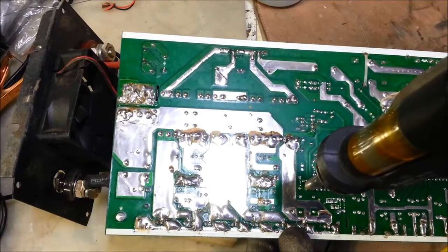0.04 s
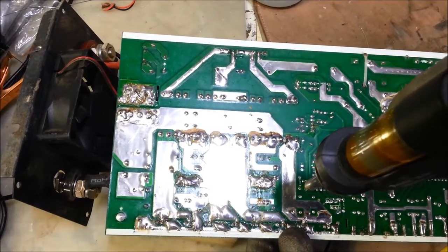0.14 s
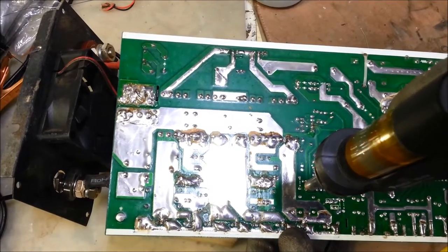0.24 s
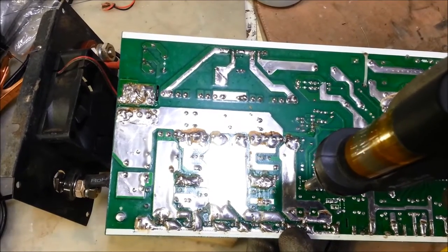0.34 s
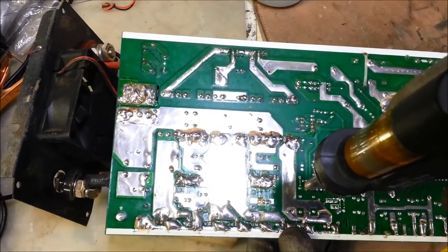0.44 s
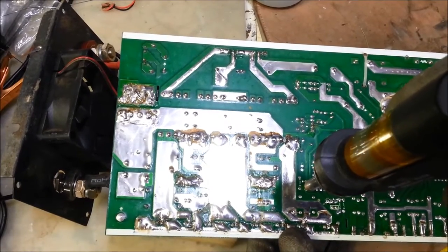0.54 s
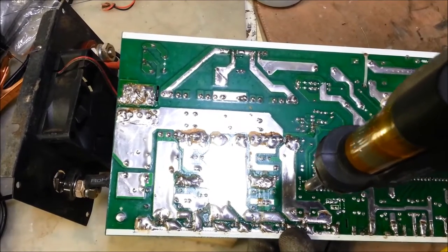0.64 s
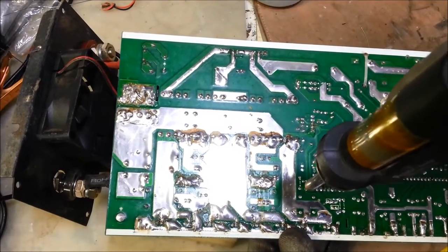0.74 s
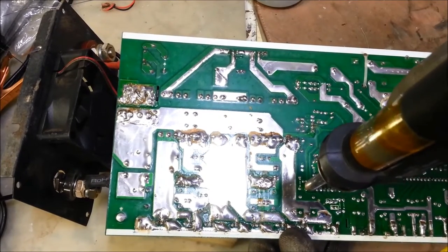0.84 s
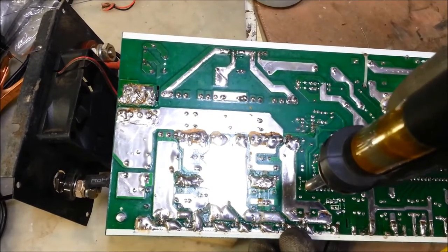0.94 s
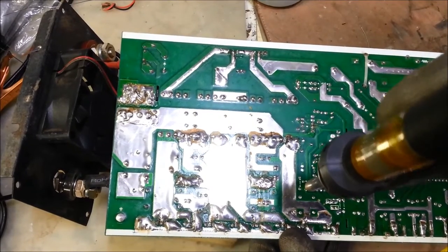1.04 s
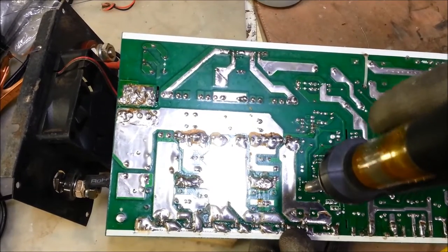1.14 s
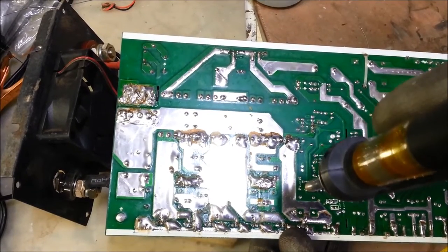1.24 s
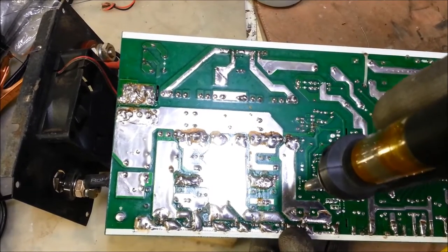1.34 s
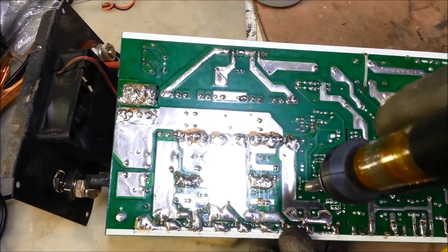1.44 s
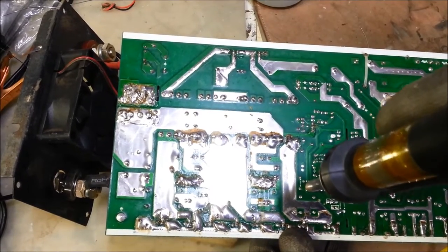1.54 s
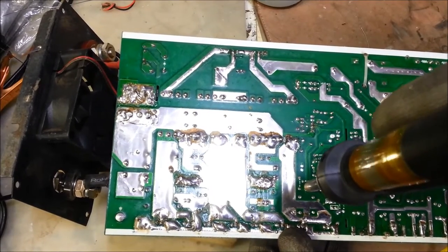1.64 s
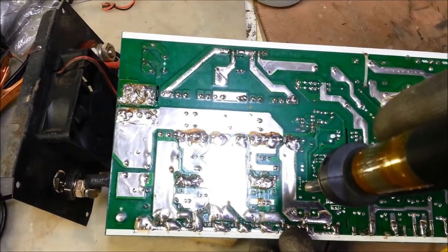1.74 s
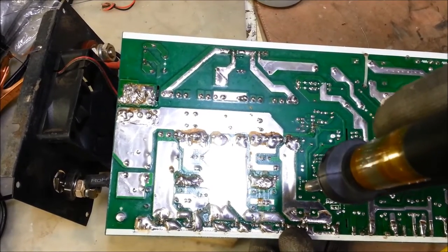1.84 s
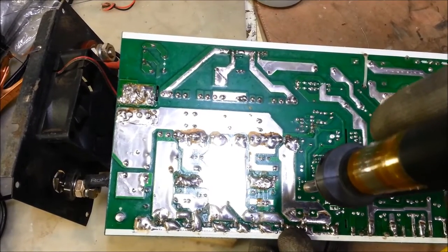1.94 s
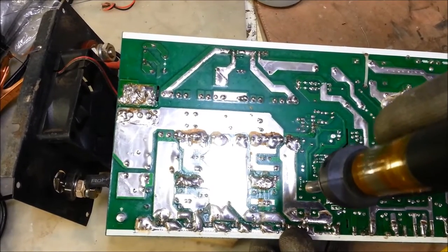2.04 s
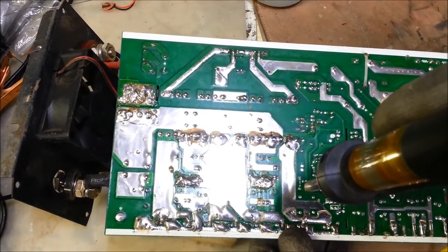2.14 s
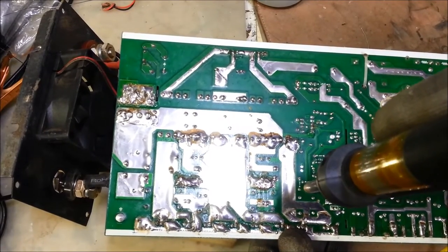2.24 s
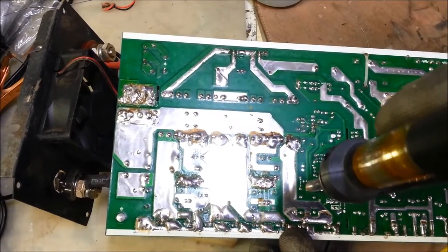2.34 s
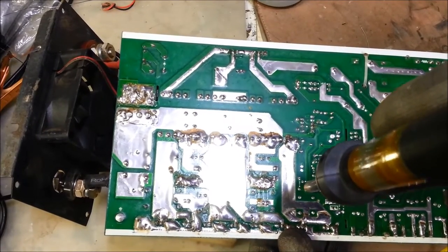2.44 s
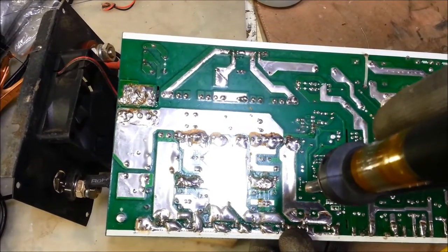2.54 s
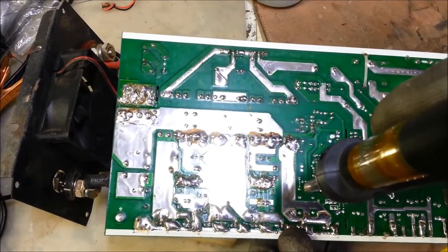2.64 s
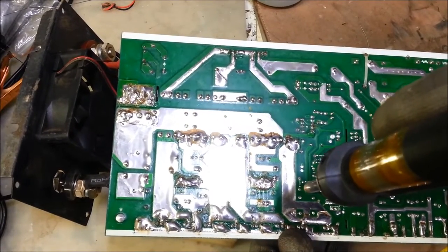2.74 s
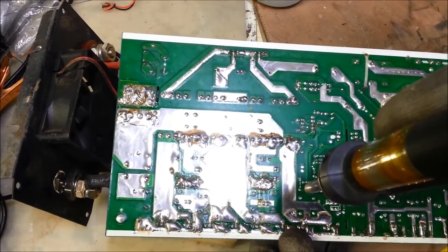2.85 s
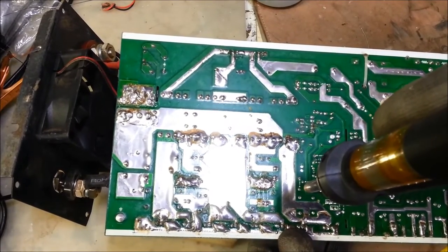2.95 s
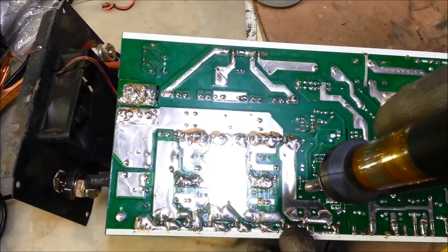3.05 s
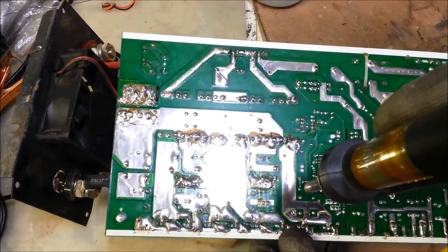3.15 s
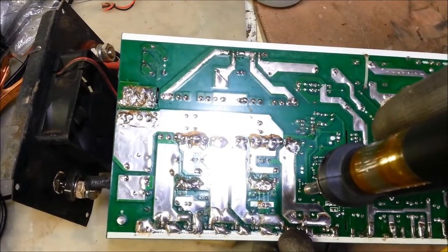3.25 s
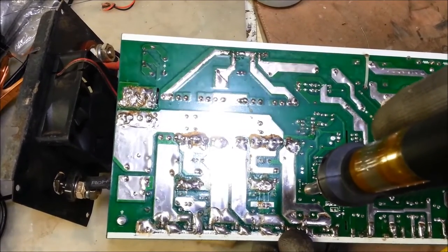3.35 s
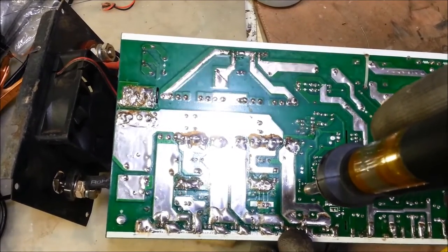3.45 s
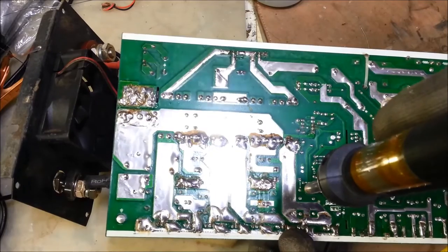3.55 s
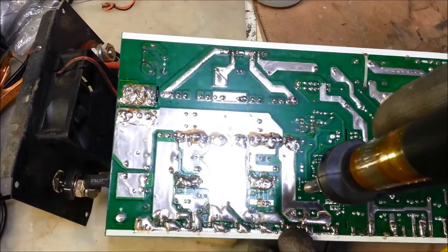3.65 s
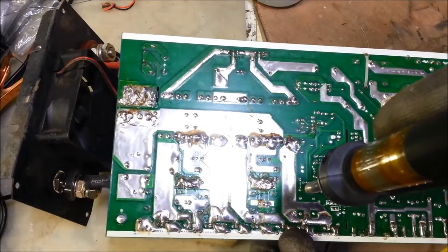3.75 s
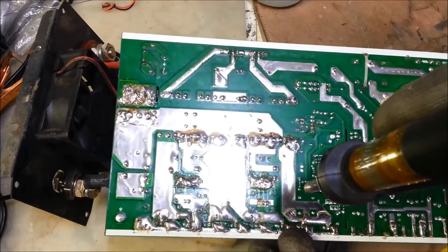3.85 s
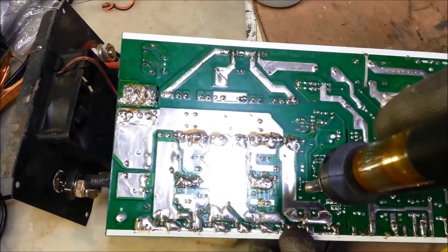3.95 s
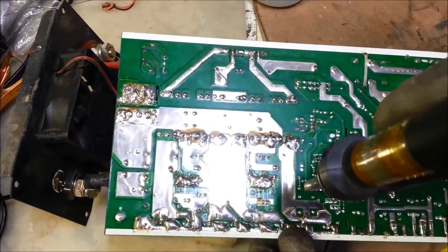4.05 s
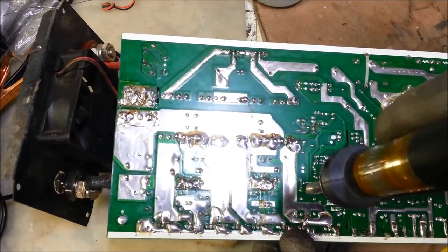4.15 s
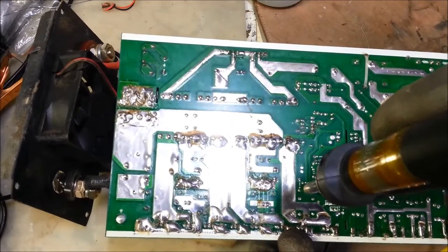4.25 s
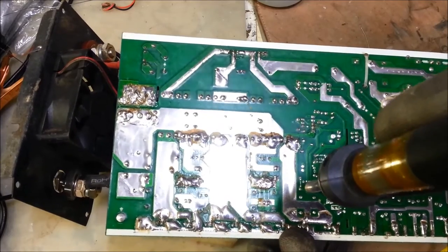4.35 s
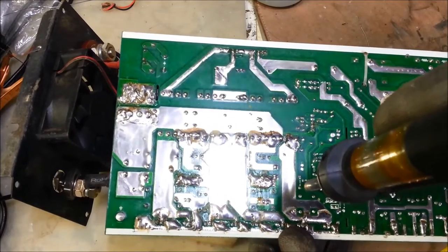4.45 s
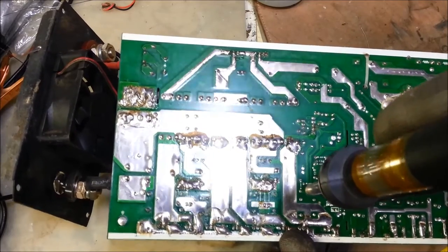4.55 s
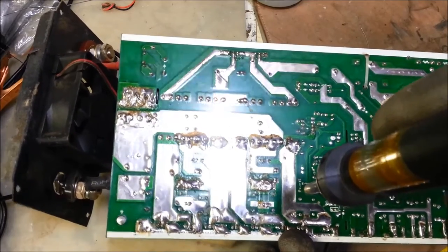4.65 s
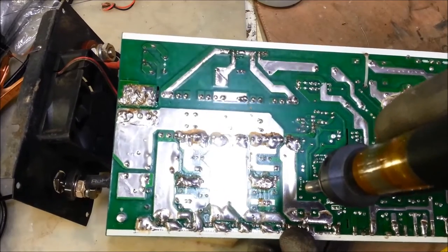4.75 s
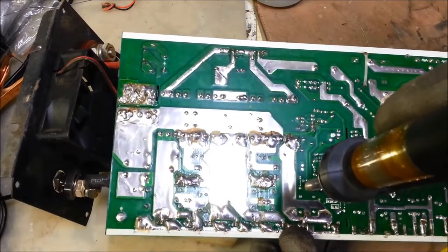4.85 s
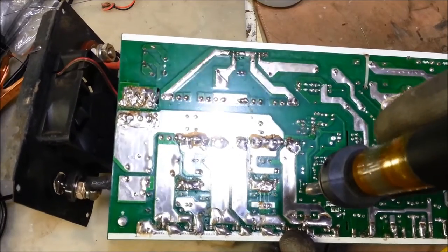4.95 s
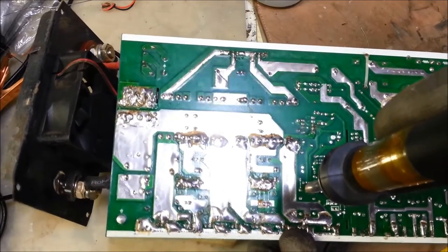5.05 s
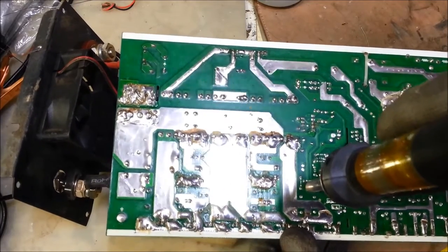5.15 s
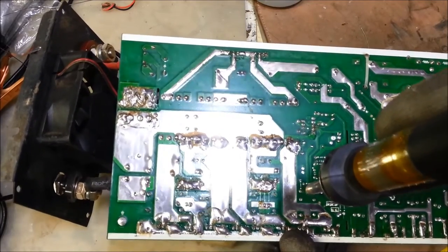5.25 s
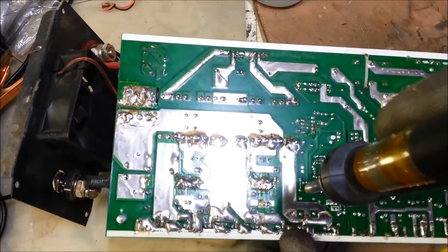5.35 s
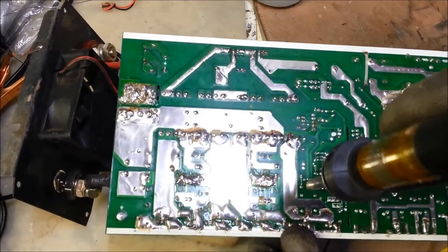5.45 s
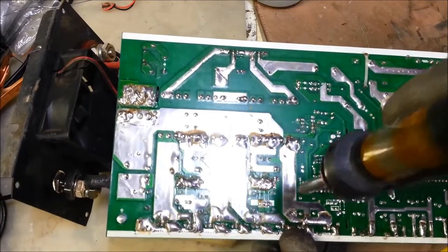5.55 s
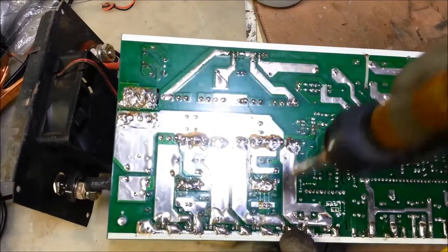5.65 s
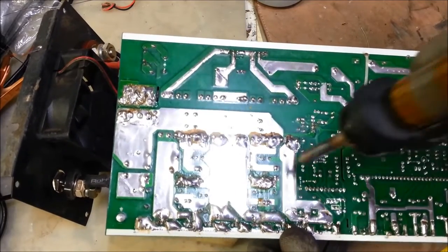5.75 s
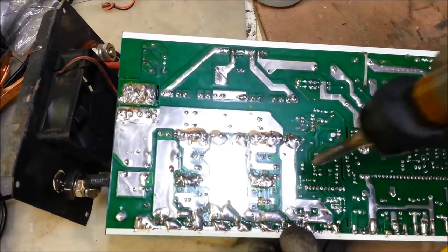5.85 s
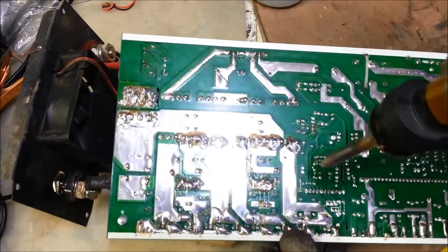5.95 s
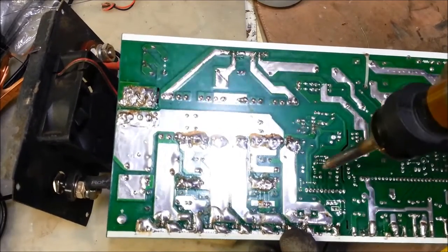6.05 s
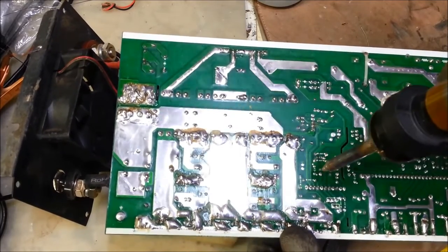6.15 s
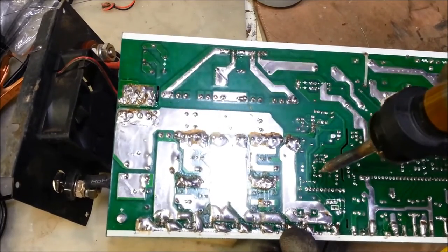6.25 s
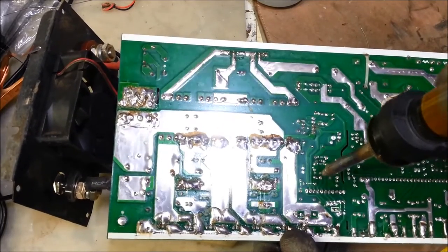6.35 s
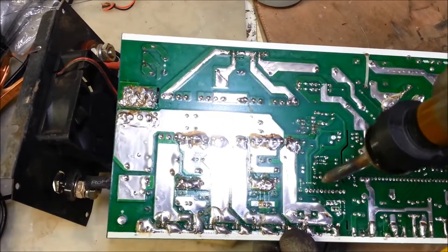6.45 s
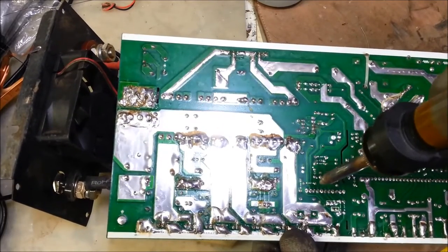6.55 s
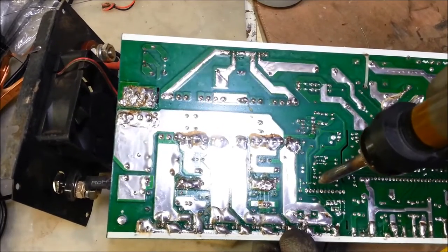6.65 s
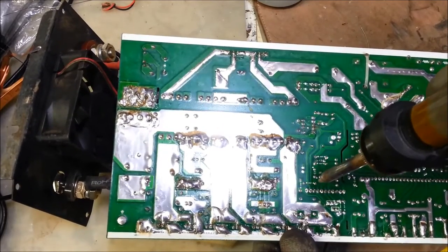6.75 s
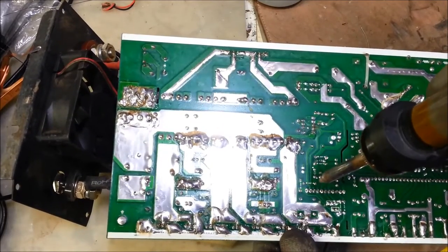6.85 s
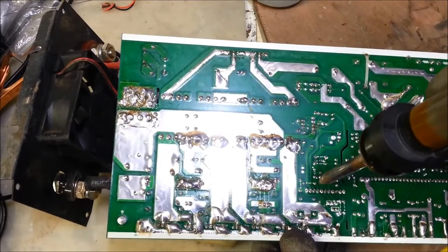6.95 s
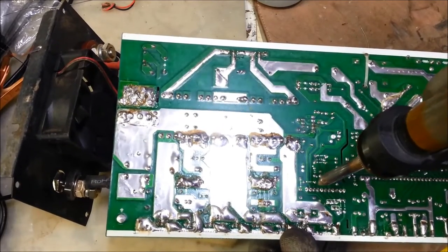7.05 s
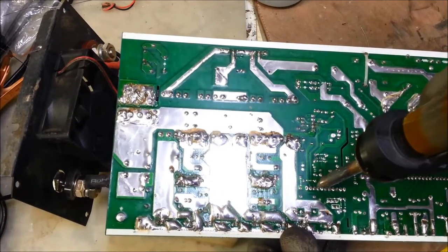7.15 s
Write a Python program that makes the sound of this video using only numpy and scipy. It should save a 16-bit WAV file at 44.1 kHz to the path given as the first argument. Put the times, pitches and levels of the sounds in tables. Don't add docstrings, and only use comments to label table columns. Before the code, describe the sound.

A steady airy fan whine fills a small room, dotted with small gritty scrapes and hard taps of metal on board. Past the midpoint a sharp click starts a desoldering gun's pump, a dense low rattling buzz with bright air hiss, very loud and close. It ends with a short squeak and snap, a couple of dying knocks, then the fan's whine rising again over faint contacts.

```python
import sys
import numpy as np
from scipy import signal
from scipy.fft import rfft, irfft, next_fast_len
from scipy.io import wavfile

SR = 44100
rng = np.random.default_rng(int(sys.argv[2]) if len(sys.argv) > 2 else 0)


def master(y):
    cut = np.clip(np.atleast_2d(y).T, -1, 1)
    pcm = np.round(cut * 32767)
    wavfile.write(sys.argv[1], SR, pcm.astype(np.int16))


def to_linear_factor(level_db):
    exponent = np.asarray(level_db, float) / 20
    return 10 ** exponent


N = 317705
T_S = np.arange(N) / SR

# multiple, full_speed_db, slowed_db, left_minus_right_db
FAN_WHINE = [(1, -3.5, -3.5, -1.5), (3, -25, 0, 14), (4, -6, 0, 12), (5, -5.5, -4.5, -14),
             (6, 3.5, -23, -5.5), (7, -10, -1, -1), (8, -16, -3.5, 1)]
# start_s, sixth_multiple_hz
FAN_HUNT = [
    (0.05, 2379),
    (0.57, 2376),
    (1.01, 2388),
    (1.49, 2376),
    (2.17, 2386),
    (2.89, 2376),
    (3.44, 2388),
    (3.8, 2385),
]
HUNT_DB_PER_HZ = {5: -0.3, 6: 0.34}
# freq_hz, half_width_hz, level_db
DEAD_SPOTS = [(1554, 26, -3.5), (1787, 31, -2), (1890, 23, -7), (2610, 18, -7), (2743, 24, -12)]
# freq_hz, level_db_per_hz
FAN_RUSH = [(60, -46), (120, -27), (200, -24.5), (300, -11.5), (385, -3.5), (460, -6.5), (540, -9),
            (680, -11.5), (1050, -6.5), (1400, -12), (1900, -11.5), (2600, -18.5), (4000, -18.5),
            (6500, -30.5)]
# freq_hz, level_db_per_hz
FAN_HISS = [(1760, -27.5), (3000, -21), (4490, -20), (5220, -6), (13900, -12), (14750, -10), (15000, -10)]
# freq_hz, share
ALIKE = [(60, 0.6), (170, 0.48), (350, 1), (700, 0.89), (1100, 0.19), (2000, 0.059), (3500, 0.33),
         (8000, 0.038), (15000, 0.046)]
# start_s, level_db
JOLTS = [
    (1.27, -69),
    (1.55, -76),
    (2.13, -81),
    (2.39, -66),
    (4.3, -60),
    (5.69, -51),
    (6.05, -74),
    (6.15, -69),
    (6.681, -79),
]
# start_s, peak_db, ring_hz, dull_db
TOUCHES = [(0.368, -43, 3450, -39), (.607, -36.5, 5700, -35), (.72, -51, 3240, -46),
           (1.087, -47, 4960, -39), (1.21, -44, 3800, -38), (1.231, -37, 5160, -32),
           (1.253, -37, 5500, -33), (1.516, -43.5, 5300, -39), (1.606, -46, 4900, -40),
           (1.81, -53, 3200, -42), (1.8775, -45, 5000, -33.5), (2.002, -42, 5000, -38),
           (2.083, -39, 5800, -37), (2.1286, -27, 5600, -24.5), (2.133, -36, 9000, -34),
           (2.156, -39, 6070, -32), (2.2637, -54, 4950, -39), (2.293, -48, 3000, -33.5),
           (2.3395, -29, 8500, -44), (2.384, -23.5, 5300, -25), (2.412, -31.5, 5000, -24.5),
           (2.652, -40, 4570, -32), (2.735, -45, 5100, -30.5), (2.777, -38.5, 4860, -32),
           (2.86, -34, 5670, -35), (4.288, -29, 3256, -33), (5.3, -31.5, 8800, -40),
           (5.325, -30, 8600, -36), (5.76, -48, 3090, -48), (6.178, -54, 3010, -38),
           (6.45, -38.5, 5300, -40)]
# start_s, peak_db, ring_hz, t60_s
TAPS = [(1.2317, -26, 5240, .02), (1.2535, -15.5, 4930, 0.013), (1.8134, -44, 3200, .012),
        (1.8778, -26.5, 2270, 0.016), (1.881, -33, 1150, 0.033), (2.1312, -23, 4350, 0.012),
        (2.265, -28.5, 1020, .04), (2.416, -33, 1110, 0.035), (2.3851, -21, 3100, .012),
        (5.698, -20, 835, 0.07), (5.722, -28, 860, .05), (5.743, -26.5, 2660, 0.027),
        (5.757, -26, 1980, 0.021), (5.762, -32, 2430, 0.059)]
# freq_hz, level_db, t60_s
PRESS_MODES = [(1400, -14, .02), (2300, -7, .012), (3200, -8, .02), (4600, -5, .008), (5200, -1, .009),
               (5900, -12, .02), (7240, -3, .016), (9500, -14, .01), (11800, -9, .012), (13500, -14, .01)]
# start_s, pitch_hz, level_db
SQUEAK = [
    (5.671, 7050, -31),
    (5.682, 7150, -20),
    (5.688, 6900, -10.5),
    (5.696, 5070, -36),
]
# freq_hz, level_db, t60_s
SNAP_MODES = [(3740, 0.5, 0.042), (4400, 0.5, 0.0037), (5500, -8, 0.008), (6630, 3.5, 0.01),
              (7600, 1.5, 0.0066), (8600, -13, .006), (9800, -14, .006), (11670, -10.5, 0.0054),
              (14100, -6, .004)]
# start_s, rate_strokes_per_s, grip_db (lift of modes over 700 Hz)
PUMP_LOAD = [
    (4.15, 87.9, 1.0),
    (4.304, 88.6, -1),
    (4.662, 88.8, 2),
    (4.7, 89.4, 2.5),
    (4.948, 88.5, 2),
    (5.092, 87.4, 2),
    (5.158, 88.0, 2),
    (5.462, 88.3, 2),
    (5.66, 87.8, 1.0),
]
# freq_hz, width_hz, level_db, left_minus_right_db, left_late_ms
CASE_MODES = [(165, 26, -6.2, -1.2, .52), (256, 36, -7, -1.3, .37), (347, 26, 2.6, -.4, .33),
              (525, 43, -17.5, 8, .37), (632, 37, -28, 8, .36), (793, 80, -19, 3, .46),
              (906, 181, -19.5, 20, 0), (957, 38, -7.5, 20, 0), (1032, 64, -9.5, 1.5, .33),
              (1181, 50, -12.5, 6, .2), (1409, 48, -6.5, 5, .41), (1482, 78, -17.5, -14, 0),
              (1680, 90, -21, 2, .38), (1925, 100, -12.5, -5.7, .38), (2081, 76, -11.5, 2.2, .38),
              (2296, 46, -6, 1, .31), (2418, 68, -21, 19.5, .35), (2655, 43, -15.5, 3, .33),
              (3065, 150, -27, -4, .45), (3290, 40, -15, -1, .31), (3910, 96, -34, -2, .32),
              (2250, 500, -27, 0, .35)]
# top_hz, late_ms
PANELS = [(200, 2.06), (450, 1.62), (700, 3.49), (1250, 2.43), (1800, 7.99), (2900, 3.65), (5000, 5.8)]
# top_hz, level_db
SLACK = [(200, -0.85), (300, -.45), (450, -0.0441), (700, 0.285), (930, .5), (1000, 0.17), (1100, 0.1),
         (1250, -0.1545), (1600, -0.2035), (1800, 0.16), (2200, 0), (2350, -0.22), (5000, -0.2838)]
# freq_hz, level_db_per_hz
SUCTION = [(1470, 1.5), (2500, -3), (2870, -23.5), (3310, -11), (3950, -11), (5190, -10.5), (8910, -11.5),
           (11700, -27), (12300, -21.5), (14300, -23), (14600, -24), (14900, -24)]
# freq_hz, width_hz, level_db
WHISTLES = [(5300, 80, 0), (6200, 43, 3), (7800, 44, 0)]
# freq_hz, level_db, t60_s
LAST_STROKE = [(334, -7, 0.042), (790, -10, 0.044), (957, -5, 0.059), (1190, -12, 0.032), (1950, -12, .025),
               (2600, -14, .022)]

ON_S, OFF_S, STALL_S = 3.834, 5.688, 5.765
FAN_BLADES_PER_S, FAN_SAG_S = 397.3, 0.2


def rms_one(x):
    return x / np.sqrt(np.mean(x ** 2) + 1e-20)


def from_db(db):
    return np.exp(db * np.log(10) / 20)


def since(at_s):
    return np.maximum(T_S - at_s, 0)


def bump(at_s, width_s):
    return np.exp(-((T_S - at_s) / width_s) ** 2)


def in_time(rows):
    s, *columns = np.transpose(rows)
    return [np.interp(T_S, s, c) for c in columns]


def at_hz(points, hz):
    points = np.array(points)
    return np.interp(np.log(hz), np.log(points[:, 0]), points[:, 1])


def drift(rate_hz):
    r = np.exp(-80 * np.pi * rate_hz / SR)
    white = rng.standard_normal(N // 40 + 4002)
    slow = signal.lfilter([1], [1, -2 * r, r * r], white)[4000:]
    return np.interp(np.arange(N) / 40, np.arange(len(slow)), rms_one(slow))


def butter(x, order, hz, kind):
    return signal.sosfilt(signal.butter(order, hz, kind, fs=SR, output="sos"), x)


def resonance(x, hz, width_hz):
    r = np.exp(-np.pi * width_hz / SR)
    poles = [1, -2 * r * np.cos(2 * np.pi * hz / SR), r * r]
    return signal.lfilter(np.array([1, 0, -1]) * (1 - r * r) / 2, poles, x + 1e-18)


def ports(x, pan_db, lag_ms=0.374):
    whole, part = divmod(max(lag_ms, 0) * SR / 1000, 1)
    late = (1 - part) * np.roll(x, int(whole)) + part * np.roll(x, int(whole) + 1)
    return np.array([late * to_linear_factor(pan_db / 2), x * to_linear_factor(-pan_db / 2)])


def air(spectrum, patchy_db, pan_db):
    top_hz = 14700
    ends = np.log2(np.array(spectrum)[[0, -1], 0])
    edges = 2 ** np.arange(ends[0], ends[1] + 0.2, 1 / 3)
    white = rng.standard_normal((2, 3, N))
    out, together = 0, drift(27.0)
    for k, (low, high) in enumerate(zip(edges, edges[1:])):
        both, *own = butter(white[k % 2], 2, [low, high], "band")
        hz = np.sqrt(low * high)
        alike = np.clip(at_hz(ALIKE, hz), 0, 1)
        gain = from_db(at_hz(spectrum, hz) + patchy_db * (0.47 * together + drift(6.9)))
        out = out + gain * (np.sqrt(alike) * ports(both, 0) + np.sqrt(1 - alike) * np.array(own))
    out = signal.sosfilt(signal.cheby2(16, 45, top_hz, fs=SR, output="sos"), out)
    return rms_one(out) * to_linear_factor(np.array([[pan_db], [-pan_db]]) / 2)


def click(at_s, modes, chatter_s, crack_db, from_hz=250):
    out, t = np.zeros((2, N)), np.arange(4000) / SR
    for delay_s, db in [(0, -3), (chatter_s, 0), (3.5 * chatter_s, -11)]:
        start = round((at_s + delay_s) * SR)
        hit = to_linear_factor(crack_db - 60 * t / 0.025) * np.diff(rng.standard_normal((2, len(t) + 1)))
        for hz, level_db, t60_s in modes:
            phase = 2 * np.pi * hz * t + rng.uniform(-0.69, 0.74, (2, 1))
            hit += to_linear_factor(level_db - 60 * t / t60_s) * np.sin(phase)
        out[:, start:start + len(t)] += to_linear_factor(db) * hit
    return butter(out + 1e-9 * np.cos(np.arange(N)), 3, from_hz, "high")


def fan_state():
    sag_per_s, regain_s = 61, 0.47
    load = -np.expm1(-since(ON_S) / FAN_SAG_S)
    running = load * np.clip(1 - since(OFF_S + 0.074) / 0.023, 0, 1)
    before = np.clip(1 - since(ON_S) / FAN_SAG_S, 0, 1)
    duck_db = -5.5 * (load - running) * np.exp(-since(STALL_S + 0.16) / 1.5)
    rush_db = -43.5 - 0.7 * T_S * before + 6 * running + duck_db
    hiss_db = -56 + 1 * running + 0.73 * duck_db
    whine_db = -51.5 + 0.4 * (T_S - 1.9) * before + 3 * running + 0.55 * duck_db
    blades_per_s = FAN_BLADES_PER_S - sag_per_s * load * np.exp(-since(OFF_S) / regain_s)
    return blades_per_s, rush_db, hiss_db, whine_db


def dead_spot_db(hz):
    loss_db = 0
    for at, half_width_hz, db in DEAD_SPOTS:
        if hz.min() < at < hz.max():
            loss_db = loss_db + db * np.clip(2 - abs(hz - at) / half_width_hz, 0, 1)
    return loss_db


def fan():
    blades_per_s, rush_db, hiss_db, whine_db = fan_state()
    flutter_db = 1.1
    slowed = (397 - blades_per_s) / 50
    idle = np.clip(1 - since(ON_S) / FAN_SAG_S, 0, 1)
    hunt_hz = (in_time(FAN_HUNT)[0] - 6 * FAN_BLADES_PER_S) * idle
    phase = 2 * np.pi * np.cumsum((blades_per_s + hunt_hz / 6) * (1 + 0.0005 * drift(7.9))) / SR
    whine = 0
    for k, db, slow_db, pan_db in FAN_WHINE:
        level_db = db + dead_spot_db(k * blades_per_s) + slowed * (slow_db - db)
        level_db = level_db + HUNT_DB_PER_HZ.get(k, 0) * hunt_hz + flutter_db * drift(4.4)
        whine = whine + ports(from_db(level_db) * np.sin(k * phase + k * k), pan_db)
    rush = butter(to_linear_factor(rush_db) * air(FAN_RUSH, patchy_db=0.6, pan_db=-0.5), 3, 170, "high")
    hiss = to_linear_factor(hiss_db) * air(FAN_HISS, patchy_db=0.5, pan_db=0.2)
    return to_linear_factor(whine_db) * whine + rush + hiss


def bench(shaken):
    low = butter(rng.standard_normal((2, N)), 2, [10, 100], "band")
    jolts = sum(to_linear_factor(db) * bump(s, 0.028) for s, db in JOLTS)
    lumps = to_linear_factor(3.5 * drift(9))
    return rms_one(low) * (lumps * (to_linear_factor(-89) + to_linear_factor(-56) * shaken) + jolts)


def touches():
    out, t = np.zeros((2, N)), np.arange(3000) / SR
    for s, db, hz, dull_db in TOUCHES:
        length_s = 0.012 + 0.0004 * (dull_db + 40)
        shape = (1 - np.exp(-t / 0.003)) ** 2 * np.exp(-2.5 * t / length_s)
        grit = rng.standard_normal((3, len(t))) * to_linear_factor(5.8 * rng.standard_normal(len(t))) * shape
        grit = grit[0] + 1.1 * grit[1:]
        ring = resonance(resonance(grit, hz, 0.24 * hz), hz, 0.24 * hz)
        scratch = 0.5 * min(to_linear_factor(1.3 * (dull_db - db)), 1) * resonance(grit, 6000, 11000)
        bright = ring + scratch
        dull = resonance(resonance(grit, 1020, 1250), 1000, 2500)
        dull = dull + 0.61 * resonance(resonance(grit, 2200, 2800), 2200, 6000)
        burst = to_linear_factor(db + 3.5) * bright / np.abs(bright).max() + to_linear_factor(dull_db) * dull / np.abs(dull).max()
        start = round((s - 0.001) * SR)
        out[:, start:start + len(t)] += burst
    return out


def taps():
    out, t = np.zeros((2, N)), np.arange(2000) / SR
    for s, db, hz, t60_s in TAPS:
        ring = sum(g * np.sin(2 * np.pi * m * hz * t) for m, g in [(1, 1), (1.27, 0.4), (2.1, 0.2)])
        crack = 0.1 * min(hz / 3000, 1) * np.diff(rng.standard_normal((2, len(t) + 1)))
        hit = ports(0.47 * ring, -1.0, lag_ms=0.043) + crack
        start = round(s * SR)
        out[:, start:start + len(t)] += to_linear_factor(db - 60 * t / t60_s) * np.minimum(t / 0.00019, 1) * hit
    return out


def trigger():
    press = to_linear_factor(-19.5) * click(3.8249, PRESS_MODES, chatter_s=0.0014, crack_db=-5)
    hz, squeak_db = in_time(SQUEAK)
    sliding = (T_S > SQUEAK[0][0]) & (T_S < SQUEAK[-1][0])
    level = sliding * to_linear_factor(squeak_db + 1.3 * drift(300))
    squeak = level * np.sin(2 * np.pi * np.cumsum(hz * (1 + 0.0131 * drift(300))) / SR)
    snap = to_linear_factor(-9.5) * click(5.688, SNAP_MODES, chatter_s=0.0007, crack_db=-14, from_hz=3300)
    snap = snap * to_linear_factor(np.array([[-1.3], [1.3]]))
    return press + snap, ports(squeak, -4.0, lag_ms=0.023)


def attack_rise_db(attack_s):
    return 20 * np.log10(1e-4 - np.expm1(-since(ON_S) / attack_s))


def motor():
    spin_up_gap_per_s, spin_up_s, coast_per_s2, creep_per_s = 38.5, 0.078, 640, 8
    working, grip_db = in_time(PUMP_LOAD)
    per_s = working - spin_up_gap_per_s * np.exp(-since(ON_S) / spin_up_s) - coast_per_s2 * since(OFF_S)
    per_s = np.maximum(per_s, creep_per_s)
    case_db = -16.5 + 2 * attack_rise_db(0.024) - 196 * since(OFF_S)
    case_db = case_db - np.minimum(500 * since(STALL_S), 18)
    puff_db = 6 * bump(OFF_S, 0.013)
    hiss_db = -31.5 + attack_rise_db(0.0073) + puff_db - 150 * since(OFF_S)
    loose = 0.5 * np.clip((86.5 - per_s) / 3, 0, 1) * np.where(since(OFF_S) > 0, 0.75, 1)
    catch_db = 5 * bump(4.03, 0.055)
    return per_s, case_db, hiss_db, 0.12 + loose, grip_db, catch_db, np.minimum(working - per_s, 30)


def pump():
    per_s, case_db, hiss_db, rattle, grip_db, catch_db, slow_per_s = motor()
    facing = "-----++--++-+--+--+-+-"
    heard_span = slice(round(3.8 * SR), round(6.1 * SR))

    turns = np.cumsum(per_s * (1 + 0.0007 * drift(12))) / SR
    at = np.interp(np.arange(1, int(turns[-1])), turns, np.arange(N))
    force = to_linear_factor(0.089 * rng.standard_normal(len(at)))
    knocks = np.zeros(N + 1)
    np.add.at(knocks, at.astype(int), force * (1 - at % 1))
    np.add.at(knocks, at.astype(int) + 1, force * (at % 1))
    knocks = knocks[:N] * np.sqrt(SR / per_s)

    flap = rng.standard_normal((3, N)) * (0.75 + np.exp(-3.0 * (turns % 1)))
    flap = flap * np.clip(rattle, 0, 2) * 0.91
    flap = 0.3 * flap + signal.lfilter([0.12], [1, -0.85], flap)
    drive = (knocks + flap[0])[heard_span]
    scattered = 0.85 * flap[1:, heard_span]

    settle_db = 3.5 * (T_S - 5.05)
    late_db = -6 * np.exp(-(since(ON_S) / 0.033) ** 4)
    sing_db = 5.5 * bump(4.35, 0.16)
    case = np.zeros((2, N))
    for k, (hz, width_hz, db, pan_db, lag_ms) in enumerate(CASE_MODES):
        slack_db = next(change_db for top_hz, change_db in SLACK if hz < top_hz)
        late_ms = next(ms for top_hz, ms in PANELS if hz < top_hz)
        wander_db = slack_db * slow_per_s + 0.5 * drift(4)
        if hz > 700:
            wander_db += grip_db + 1.2 * drift(4)
        for low_hz, high_hz, lift_db in [(700, 930, settle_db), (3200, 3400, sing_db),
                                         (700, 1000, catch_db), (300, 450, late_db)]:
            if low_hz < hz < high_hz:
                wander_db += lift_db
        sign = 1 if facing[k] == "+" else -1
        knocked = sign * resonance(np.roll(drive, round(late_ms * SR / 1000)), hz, width_hz)
        heard = ports(knocked, pan_db, lag_ms) + resonance(scattered, hz, width_hz)
        case[:, heard_span] += from_db(db + wander_db[heard_span]) * heard
    case = butter(case + 1e-9 * flap[:2], 6, 135, "high")
    case = butter(case, 3, 4200, "low")
    steady = case[:, int(4.3 * SR):int(5.6 * SR)]
    case = case * to_linear_factor(case_db - 7.0) / np.sqrt(np.mean(steady ** 2))
    case = case + to_linear_factor(-32) * click(5.835, LAST_STROKE, chatter_s=0.0033, crack_db=-36)

    breathing = to_linear_factor(1.85 * np.cos(2 * np.pi * (turns - 0.28)))
    hiss = to_linear_factor(hiss_db) * breathing * air(SUCTION, patchy_db=1.0, pan_db=-3.5)
    hiss = butter(hiss, 4, 2600, "high")
    hiss = hiss + sum(to_linear_factor(db) * resonance(hiss, hz, width_hz) for hz, width_hz, db in WHISTLES)
    return case, hiss, to_linear_factor(case_db)


def room(x):
    t60_s, wall_cut_hz = 0.51, 14000
    size = next_fast_len(N + SR)
    w = 2 * np.pi * np.fft.rfftfreq(size)
    dull = 1 / (1 + (w * SR / (2 * np.pi * wall_cut_hz)) ** 2) ** 0.035
    lags = (rng.uniform(0.004, 0.03, (2, 12)) * SR).astype(int)
    tails = np.zeros((2, len(w)), complex)
    for side in range(2):
        for k, d in enumerate(lags[side]):
            loop = to_linear_factor(-60 * d / SR / t60_s) * dull * np.exp(-1j * w * d)
            tails[side] += loop / (1 - loop) * (-1) ** k
    return irfft(rfft(x.mean(axis=0), size) * tails, size)[:, :N]


def top_dropouts(x):
    over_db, from_hz, full_hz, full_share = -32, 9900, 12000, 0.45
    hz, _, z = signal.stft(x, SR, nperseg=2048, noverlap=1536)
    loud = np.sum(np.abs(z) ** 2, axis=(0, 1)) > to_linear_factor(2 * over_db)
    draw = rng.random((len(hz) // 9 + 1, len(loud) // 6 + 1))
    draw = np.kron(draw, np.ones((9, 6)))[:len(hz), :len(loud)]
    share = full_share * np.clip((hz - from_hz) / (full_hz - from_hz), 0, 1)[:, None]
    dropped = (draw < share) & loud
    gain = np.where(dropped, 0.003, 1 / np.sqrt(1 - share * loud))
    return signal.istft(z * gain, SR, nperseg=2048, noverlap=1536)[1][:, :N]


def scene():
    case, suction, shaken = pump()
    clicks, squeak = trigger()
    contacts = touches() + taps()
    sends = to_linear_factor(-30) * case + to_linear_factor(-29) * contacts + to_linear_factor(-35) * clicks + to_linear_factor(-38) * squeak
    return case + suction + contacts + clicks + squeak + room(sends) + fan() + bench(shaken)


def band_limit(x):
    return signal.sosfilt(signal.butter(12, 15570, fs=SR, output="sos"), x)


def record(dry):
    rounded = np.tanh(dry)
    top_cut = signal.cheby2(10, 60, 15600, fs=SR, output="sos")
    mix = signal.sosfilt(top_cut, top_dropouts(rounded))
    return band_limit(mix)


dry = scene()
out = record(dry)
master(out)
```